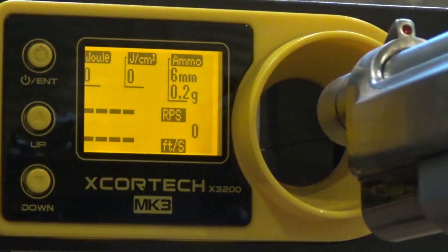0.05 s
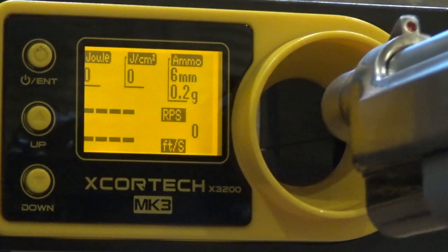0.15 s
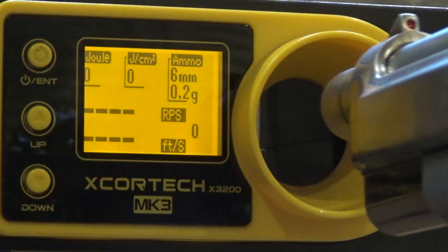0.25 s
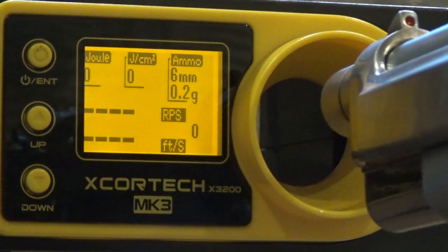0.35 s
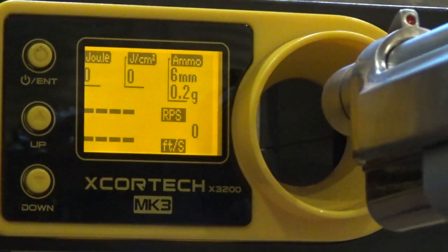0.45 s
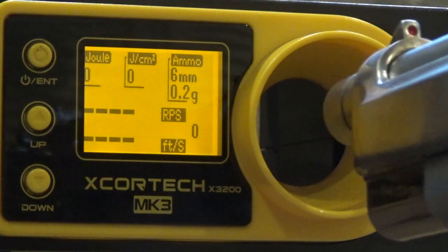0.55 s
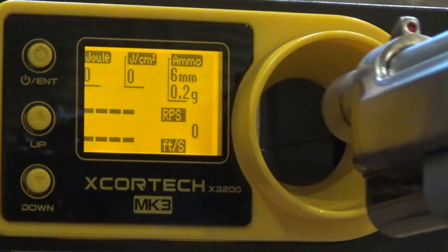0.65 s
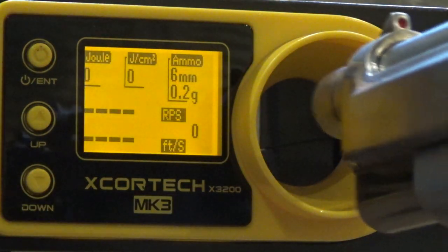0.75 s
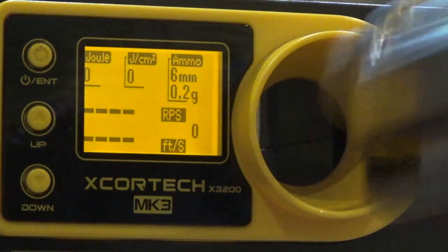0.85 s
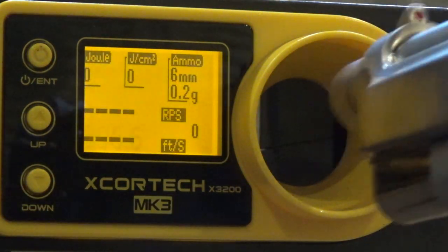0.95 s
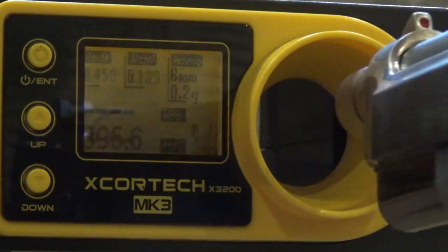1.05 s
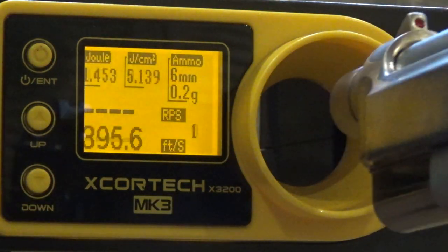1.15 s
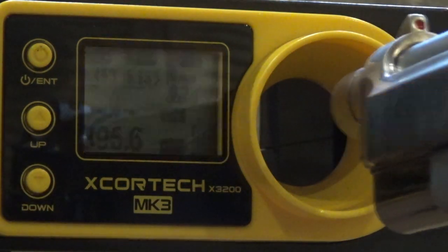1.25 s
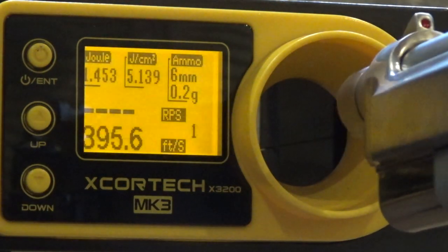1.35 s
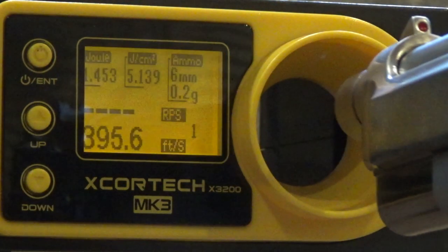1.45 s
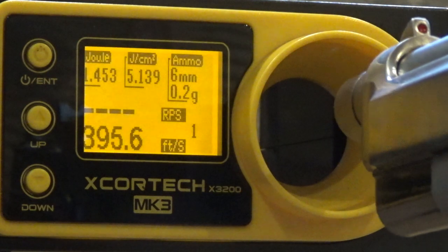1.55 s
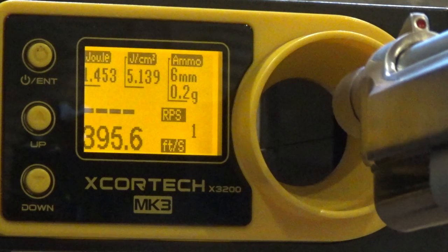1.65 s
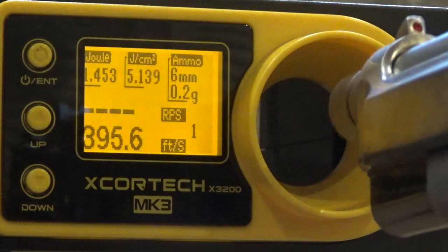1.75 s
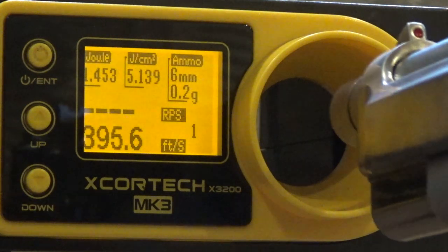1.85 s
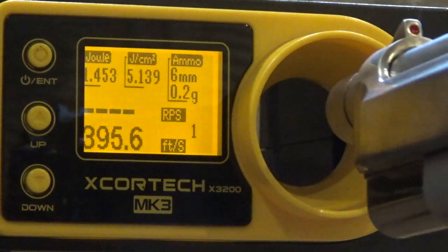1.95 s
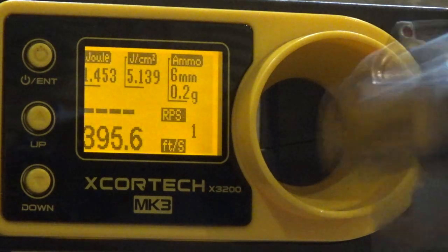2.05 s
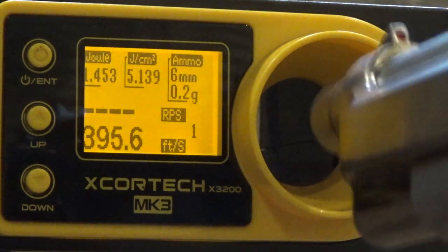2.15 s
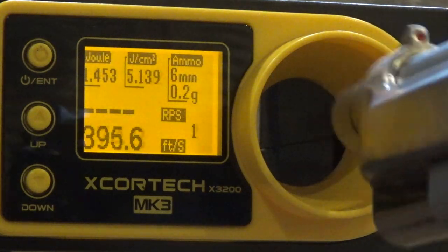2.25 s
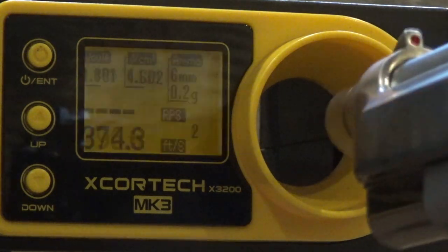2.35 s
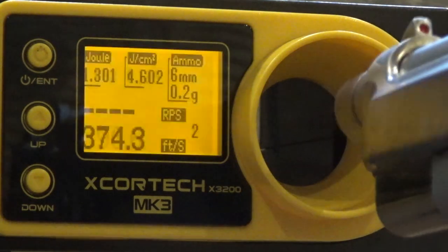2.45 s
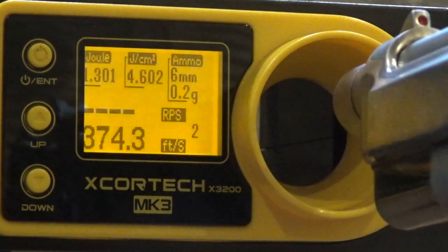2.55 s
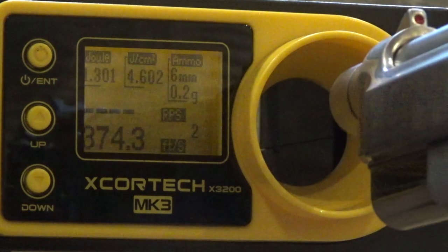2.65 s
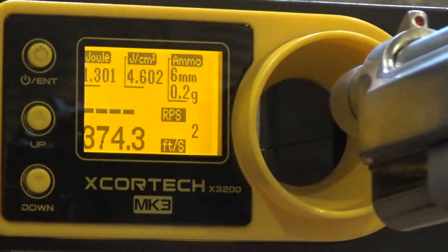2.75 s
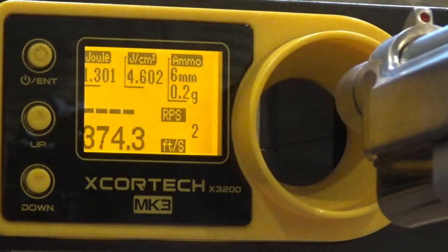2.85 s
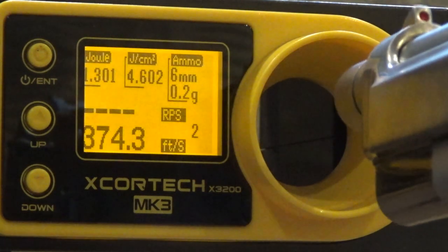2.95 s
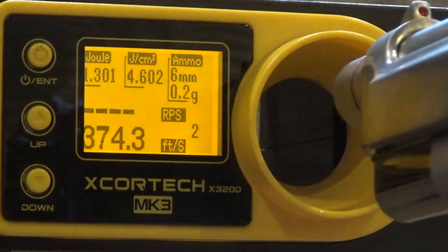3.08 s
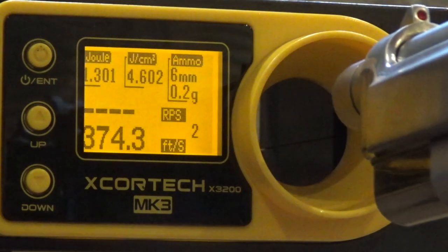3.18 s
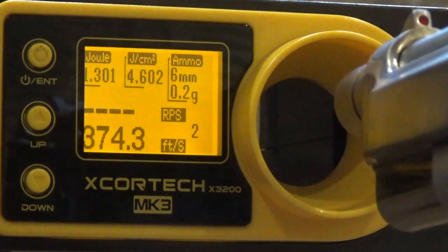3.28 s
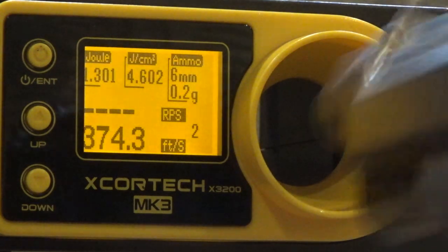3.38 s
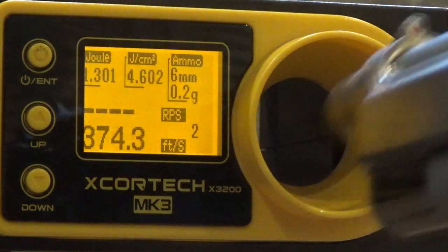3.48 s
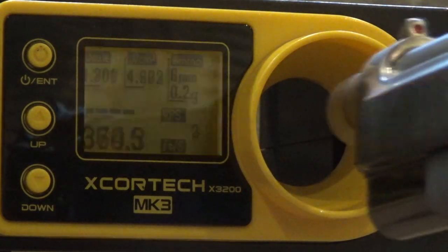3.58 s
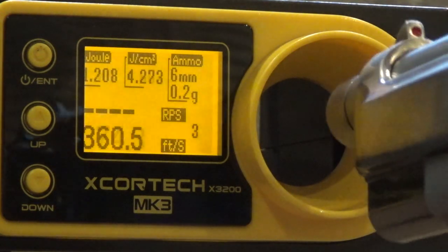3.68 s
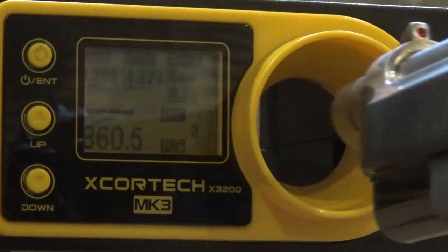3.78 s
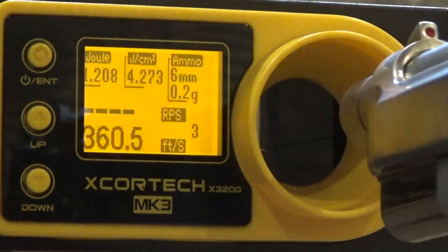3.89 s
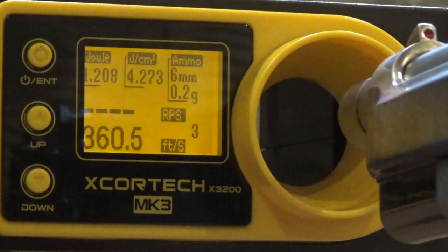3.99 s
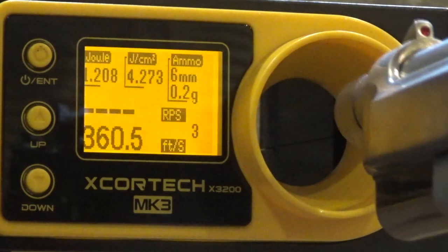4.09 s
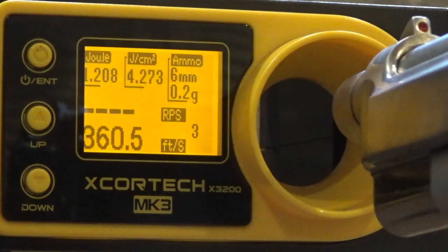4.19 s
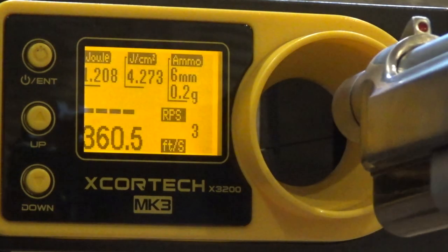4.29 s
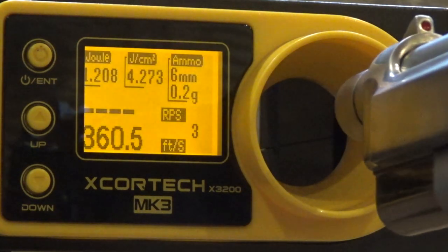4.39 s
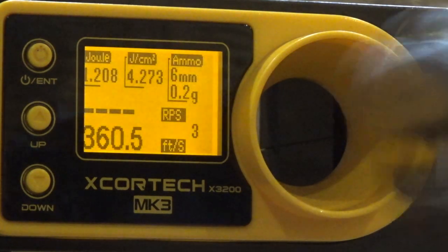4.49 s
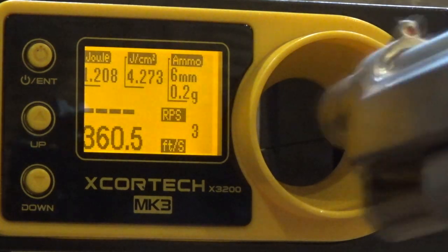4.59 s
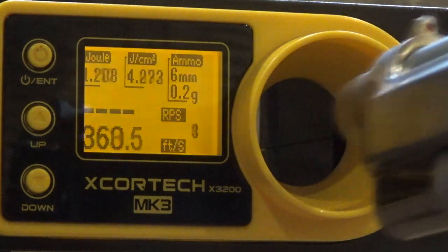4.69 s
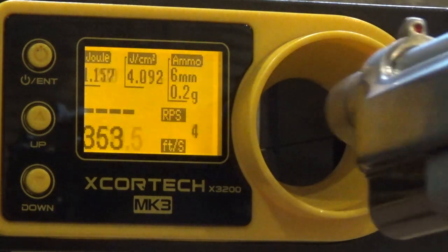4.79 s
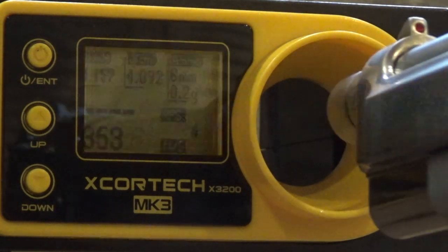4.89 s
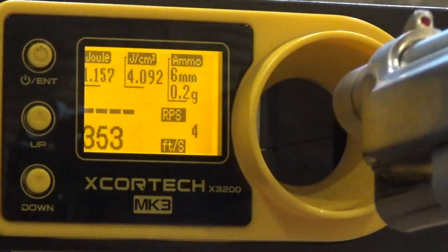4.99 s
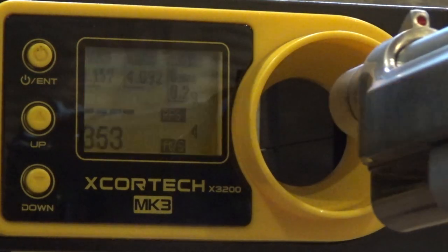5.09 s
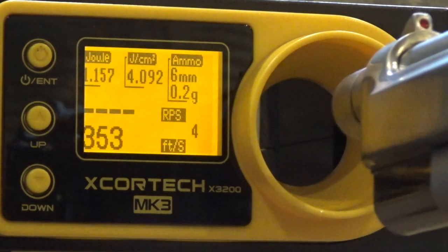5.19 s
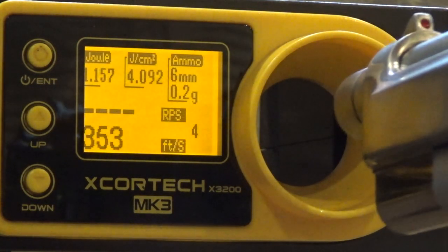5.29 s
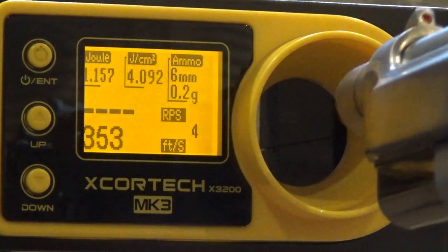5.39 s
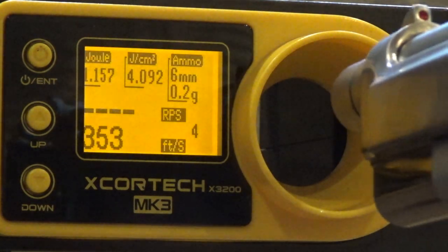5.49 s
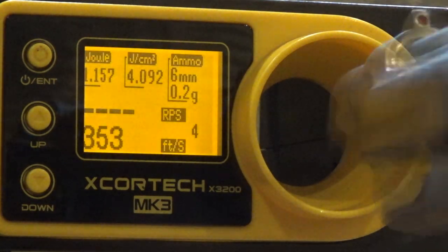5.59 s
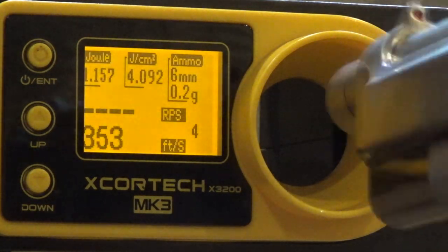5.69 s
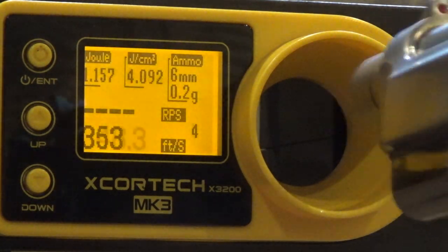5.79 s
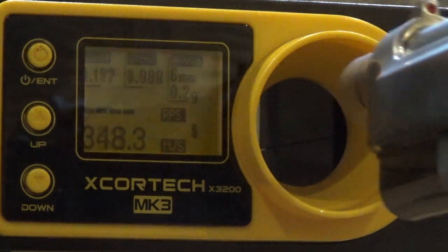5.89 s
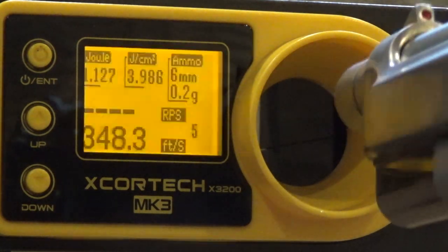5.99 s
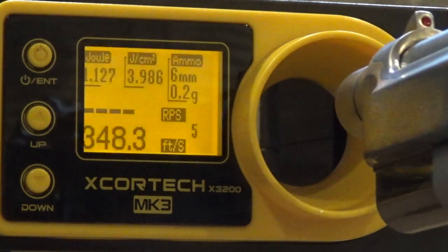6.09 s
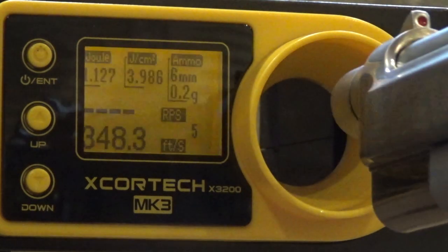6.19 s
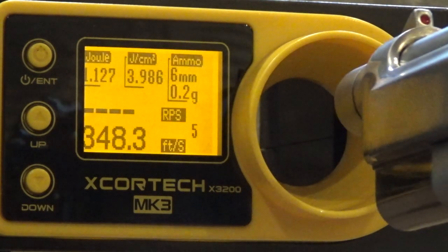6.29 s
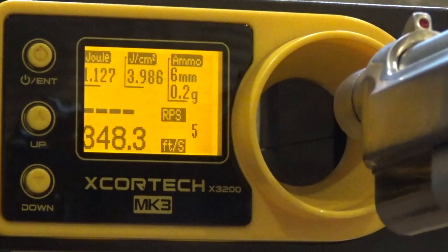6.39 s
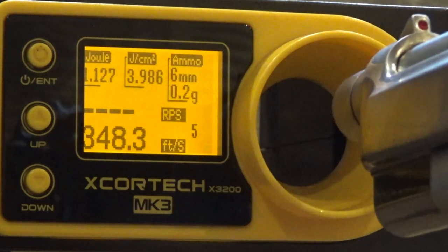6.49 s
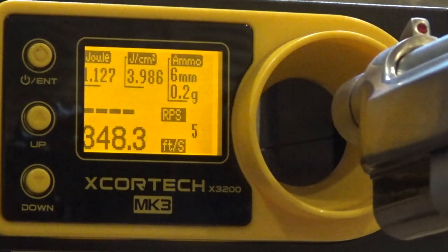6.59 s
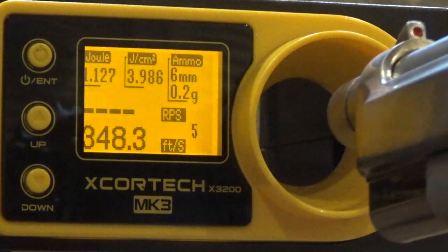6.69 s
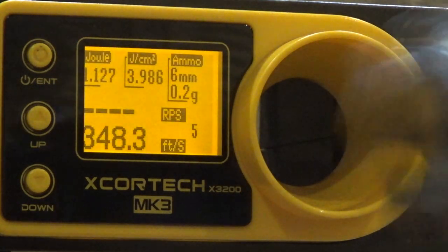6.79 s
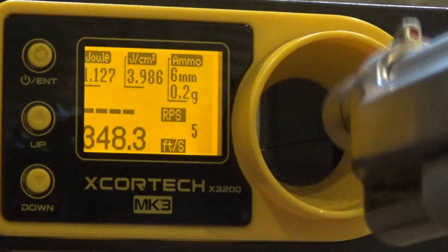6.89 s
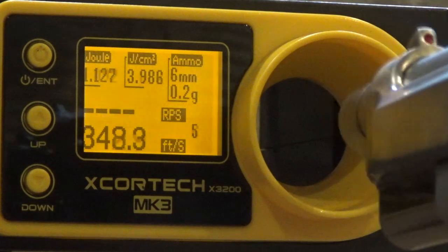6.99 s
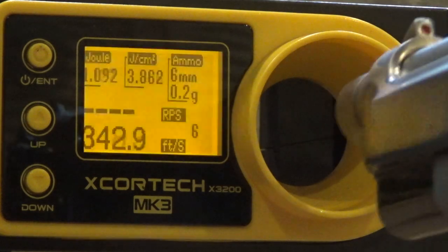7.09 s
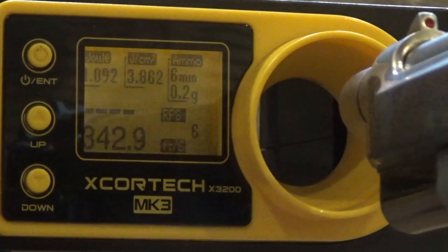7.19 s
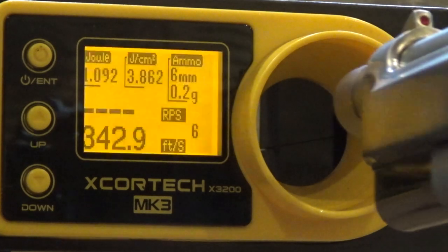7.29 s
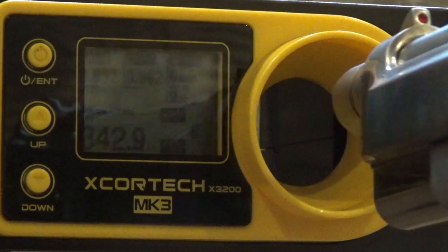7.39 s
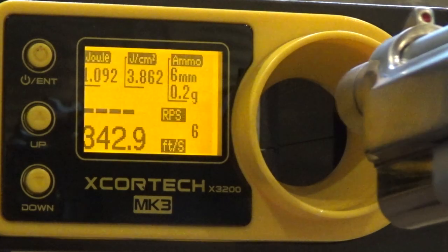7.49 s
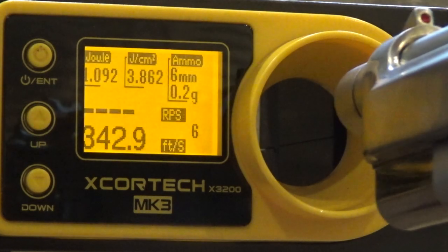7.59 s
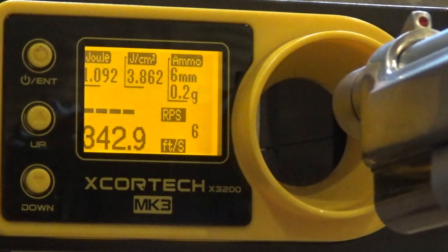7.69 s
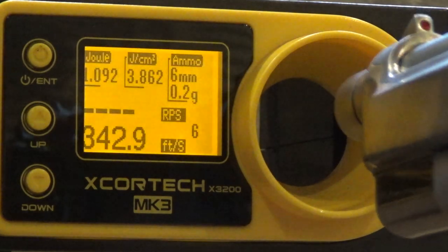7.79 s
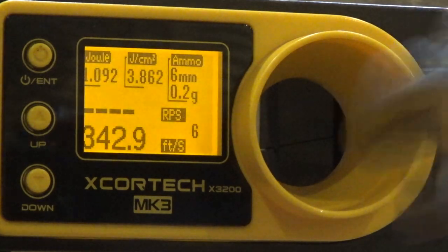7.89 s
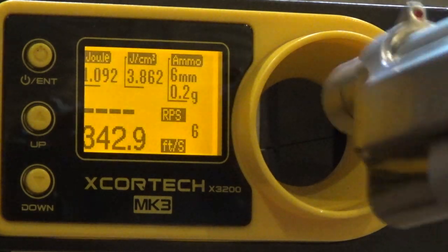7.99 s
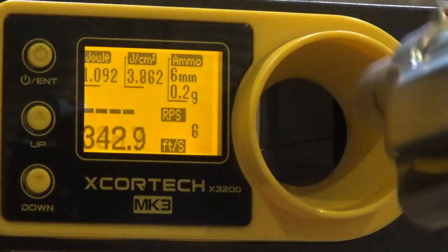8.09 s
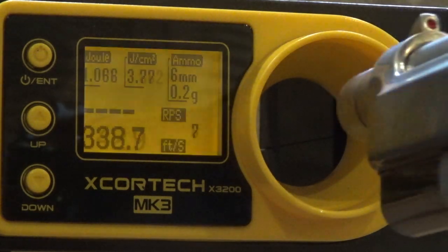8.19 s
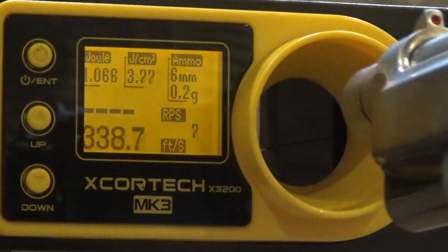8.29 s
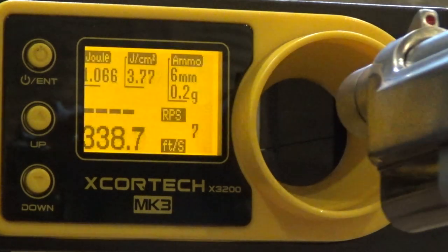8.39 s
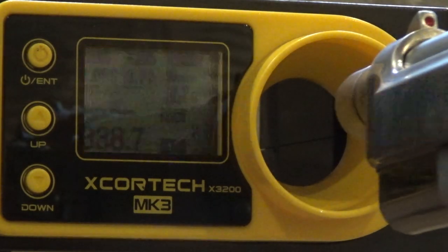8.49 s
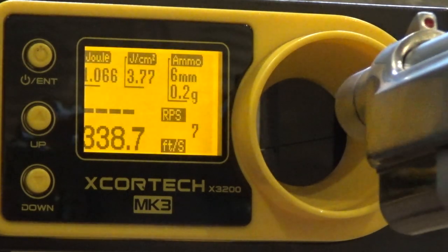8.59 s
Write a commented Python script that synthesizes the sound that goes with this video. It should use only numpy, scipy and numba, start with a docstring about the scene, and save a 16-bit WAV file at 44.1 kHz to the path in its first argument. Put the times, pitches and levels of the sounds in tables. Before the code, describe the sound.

A gas airsoft pistol fires seven single shots, a little over a second apart, close to the microphone in a small echoing room. Each is a sharp, bright burst of gas merged with the metallic clack of the slide snapping back and shut. A short echo follows, along with a light tick as the trigger resets. Only quiet room air lies between the shots.

```python
"""Seven sharp shots from a gas blowback airsoft pistol, close by in a small, echoing room.
In each shot the hammer and valve click, gas bursts from the muzzle, the slide flies back, rings and
slams shut, and the trigger resets. The gas gets colder with every shot, so its whistle rises a little.
A fast limiter (an automatic volume control) flattens the blast and its echoes into one dense crash,
which dies away into quiet room air."""
import sys
import numpy as np
from scipy import signal
from scipy.fft import rfft, irfft
from scipy.io import wavfile
from scipy.ndimage import uniform_filter1d
from numba import njit

SR = 44100
rng = np.random.default_rng(int(sys.argv[2]) if len(sys.argv) > 2 else 0)


def int16_out(signal):
    """Quantize to a 16-bit WAV file."""
    q = np.round(np.clip(np.atleast_2d(signal).T, -1, 1) * 32767)
    wavfile.write(sys.argv[1], SR, q.astype(np.int16))


N = 381453

# the shots: start_s, blast_db, puff_db, whistle_db, slam_delay_s, slam_db
SHOTS = [(0.8453, 0.5, -12.5, 2.5, 0.055, -10), (2.1037, 0, -10.5, -4.5, 0.064, -9.5),
         (3.3761, 0, -5, 0.5, 0.055, -8), (4.5037, 0.5, 0.5, -3, .0555, -6.5),
         (5.6449, 2.5, 0, -16.5, .0562, -12), (6.8146, .5, -5, -6, .0571, -9.5),
         (7.9292, 1, -4, -1, .0579, -7)]
# hammer and valve clicks before each blast: early_s, level_db, fade_s (time to fall by 60 dB)
ACTION_CLICKS = [(.0141, -21.5, 0.028), (0.012, -15, 0.011), (.0057, -17.5, 0.021), (0.0016, -12, 0.02)]
# the trigger snapping back after each shot: start_s, level_db
TRIGGER_RESETS = [(0.9887, -16), (2.2668, -18), (3.54, -17.5), (4.67, -17), (5.8096, -15.5), (6.979, -15.5),
                  (8.1099, -18)]
# ringing tones of the slide and barrel, and of the trigger spring: pitch_hz, level_db, fade_s
SLIDE_TONES = [(2140, -15.5, 0.016), (8440, -19, .02), (10080, -3.5, 0.026), (10360, -3, 0.022),
               (10430, -2, 0.019), (11150, -4.5, .02), (12200, -15.5, 0.018)]
SPRING_TONES = [(12150, -18, .06), (14010, -5, .007), (14400, -12, .025), (14900, -4, .007)]
# tone colour of rushing gas, and of the valve's whistle with warm gas: pitch_hz, level_db
GAS_COLOUR = [(40, -31), (200, -0.5), (700, 0), (1500, -0.5), (3000, -2.5), (4600, -2.5), (5800, 0),
              (7400, -0.5), (9500, 5.5), (10300, 8.5), (11200, 5), (12500, 5.5), (14000, -4), (16000, 1.5)]
WHISTLE_COLOUR = [(2000, -41.5), (4800, -14.5), (5400, -4), (5680, 2), (5980, -4.5), (6600, -13),
                  (12000, -34)]
# tone colour of small clicks, and of the slide slamming shut: pitch_hz, level_db
CLICK_COLOUR = [(200, -26.5), (1200, -12.5), (2800, -2), (4200, -6.5), (5500, 3.5), (7200, -4.5),
                (9000, 4.5), (12500, -6), (15500, -14)]
CLACK_COLOUR = [(150, -9), (800, -6), (2000, 3.5), (4500, 0.5), (7500, 1.5), (10000, 10), (12500, 5),
                (16000, -14.5)]
# tone colour of the room's echoes, and of the low boom that outlasts them: pitch_hz, level_db
ECHO_COLOUR = [(30, -15), (110, -11.5), (170, -4), (255, 4.5), (320, -0.5), (385, 7), (460, 3), (560, 6.5),
               (900, 2), (2000, 2.5), (5000, 2), (10000, -1), (16000, 3)]
BOOM_COLOUR = [(120, -24), (260, -8.5), (325, -2), (362, 2.5), (425, -10), (520, -5.5), (600, -3),
               (800, -14.5), (2000, -40.5), (8000, -60)]
# how long the echoes last: pitch_hz, fade_s
ECHO_FADE = [(100, 0.38), (250, 0.34), (400, 0.3), (630, 0.32), (1000, 0.4), (2200, 0.42), (5800, 0.41),
             (8000, 0.41), (11000, 0.34), (15000, 0.25)]
# tone colour of the room air, and of a faint whine: pitch_hz, level_db
AIR_COLOUR = [(15, -37), (25, -7.5), (113, -3.5), (340, -4.5), (368, -5), (509, -6), (552, -6.5), (598, -8),
              (919, -6), (1300, -10.5), (2060, -12), (3090, -14.5), (4150, -15), (15500, -21)]
WHINE_COLOUR = [(1000, -41), (1900, -21.5), (2060, 4), (2230, -17), (4000, -41.5)]
# stereo width (side against mid) of the echoes, and of the room air: pitch_hz, side_db
ECHO_WIDTH = [(50, -18), (250, -19.5), (600, -11.5), (1500, -8.5), (4500, -7.5), (8000, -7.5),
              (12000, -19.5)]
AIR_WIDTH = [(60, -10), (110, -15.5), (200, -8.5), (380, -4), (700, -1), (1290, -0.5), (2380, -1),
             (4400, -5), (8120, -12), (15000, -30)]

TAIL = np.arange(int(.9 * SR)) / SR  # clock for echoes, in seconds
HIT = TAIL[:SR // 4]  # clock for short sounds
LEAD_S = .02  # time left for the clicks before each blast


def gas_blast(db, puff_db, vent_s, whistle, jet_db=5, spurt_db=2, squeal_db=6, bump_db=7, hiss_db=-7):
    """Gas bursts from the muzzle: a rough jet and one smooth puff of pressure."""
    out = undb(db + jet_db) * jet(length_s=.0028)
    out += undb(puff_db + bump_db) * swell(length_s=.0021) ** 2
    # a second, whistling spurt follows the pellet
    squeal = undb(db + squeal_db) * crack(whistle, fade_s=.011)
    add(out, .0042, undb(db + spurt_db) * jet(length_s=.002) + squeal)
    # gas hisses out around the slide, and the cylinder pops like a short pipe as it opens
    out += undb(db + hiss_db) * crack(GAS_COLOUR, fade_s=.09)
    add(out, vent_s, np.sin(2 * np.pi * 520 * HIT) * swell(length_s=.0036))
    return out


def jet(length_s):
    """Swirling gas escapes for a moment."""
    return colour(burst(swell(length_s)), GAS_COLOUR)


def muzzle_beam(db, whistle_db, whistle, valve_db=-1):
    """The jet shoots on through a pellet speed meter into the room, tinted by the valve's whistle."""
    gas = burst(swell(length_s=.003))
    return undb(db) * (colour(gas, GAS_COLOUR) + undb(whistle_db + valve_db) * colour(gas, whistle))


def moving_parts(slam_s, slam_db, stop_db=-1, ring_db=15.5, clack_db=5.3, blows=3):
    """Hammer and valve click; the slide rattles on its rear stop, then slams shut and bounces."""
    stop_s, rattle_gap_s = .021, .004
    bounce_gap_s, bounce_loss_db = .0047, 3.5
    out = np.zeros(len(HIT))
    for early_s, db, fade_s in ACTION_CLICKS:
        add(out, LEAD_S - early_s, undb(db) * crack(CLICK_COLOUR, fade_s))
    for k in range(blows):
        add(out, LEAD_S + stop_s + k * rattle_gap_s, undb(stop_db) * ring(SLIDE_TONES))
    for k in range(blows):
        blow = undb(ring_db) * ring(SLIDE_TONES) + undb(clack_db) * crack(CLACK_COLOUR, fade_s=.034)
        add(out, LEAD_S + slam_s + k * bounce_gap_s, undb(slam_db - k * bounce_loss_db) * blow)
    return out


def trigger(db, spring_db=4, tick_db=-3):
    """The trigger snaps forward: a tick and the ping of its spring."""
    ping = undb(spring_db) * ring(SPRING_TONES)
    tick = undb(tick_db) * crack(CLICK_COLOUR, fade_s=.03)
    return undb(db) * (ping + tick)


def ring(tones, scatter_db=3, detune=.005):
    """Struck metal rings; each blow gives its tones slightly different strengths and pitches."""
    out = np.zeros(len(HIT))
    for hz, db, fade_s in tones:
        weaker, sharper, phase = rng.standard_normal(3)
        wave = np.sin(2 * np.pi * (hz * (1 + detune * sharper) * HIT + phase))
        out += undb(db - scatter_db * weaker) * fade(HIT, fade_s) * wave
    return out


def crack(spectrum, fade_s):
    """Sudden noise that dies fast, as when hard parts meet or gas spits out."""
    return colour(burst(fade(HIT, fade_s)), spectrum)


def room_echoes(sound, build_s=.0038):
    """Echoes pile up between near walls; their pattern changes as the gun shifts in the hand."""
    centres_hz = np.geomspace(100, 16000, 12)
    hz = np.fft.rfftfreq(len(TAIL), 1 / SR)
    noise = rfft(rng.standard_normal((2, len(TAIL))))
    echoes = 0
    # each band of pitch fades at its own speed
    for centre, share in zip(centres_hz, np.eye(len(centres_hz))):
        band = irfft(noise * look_up(np.column_stack([centres_hz, share]), hz), len(TAIL))
        echoes = echoes + band * fade(TAIL, look_up(ECHO_FADE, centre))
    mid, side = (colour(channel, ECHO_COLOUR) for channel in echoes)
    response = spread(mid, side, ECHO_WIDTH) * (1 - np.exp(-TAIL / build_s))
    response /= np.sqrt(np.sum(response[0] ** 2))
    return signal.fftconvolve(sound[None], response, axes=1)


def room_boom(db=-45, fade_s=1.16):
    """The room's low tones hang on after a blast."""
    return undb(db) * steady_noise(len(TAIL), BOOM_COLOUR) * fade(TAIL, fade_s)


def faint_hiss(db=-62, start_s=7.77, end_s=7.92, rise_s=.03):
    """A faint high hiss, like seeping gas, just before the last shot."""
    t = np.arange(N) / SR
    hiss = steady_noise(N, [(2000, -25), (7000, -12), (10000, -2), (12300, 0), (14000, -16)])
    return undb(db) * hiss * np.clip((t - start_s) / rise_s, 0, 1) * (t < end_s)


def room_air(db=-63.5, whine_db=-80):
    """Quiet, steady room air and microphone hiss, with a faint, fluttering whine."""
    mid, side = (steady_noise(N, AIR_COLOUR) for _ in range(2))
    whine = undb(whine_db) * steady_noise(N, WHINE_COLOUR)
    return undb(db) * spread(mid, side, AIR_WIDTH) + whine


def burst(envelope, passes=6):
    """Noise that follows a loudness shape, with its energy spread evenly from low to high."""
    noise = rng.standard_normal(len(HIT)) * envelope
    taper = np.abs(envelope) ** (1 / (2 * passes))
    for _ in range(passes):
        spectrum = rfft(noise)
        noise = irfft(spectrum / np.abs(spectrum), len(HIT)) * taper
    return unit(noise) * np.sqrt(np.mean(envelope ** 2))


def steady_noise(samples, spectrum):
    """Even noise with the given tone colour."""
    return unit(colour(rng.standard_normal(samples), spectrum))


def swell(length_s):
    """One smooth opening and closing of a gas path."""
    return np.sin(np.pi * np.minimum(HIT / length_s, 1))


def fade(t, fade_s):
    """Die away by 60 dB every fade_s seconds."""
    return np.exp(-np.log(1000) * t / np.maximum(fade_s, 1e-4))


def undb(db):
    """Turn decibels into a multiplier."""
    return 10 ** (np.asarray(db) / 20)


def unit(x):
    """Scale to an average (rms) level of 1."""
    return x / np.sqrt(np.mean(x ** 2))


def look_up(table, hz):
    """A table's value at hz, with octaves evenly spaced between its rows."""
    pitches_hz, values = np.transpose(table)
    return np.interp(np.log(np.maximum(hz, 1)), np.log(pitches_hz), values)


def colour(x, spectrum, size=4096):
    """Give a sound a tone colour (a minimum-phase filter)."""
    gains = undb(look_up(spectrum, np.fft.rfftfreq(size, 1 / SR)))
    cepstrum = irfft(np.log(gains))
    # fold the second half onto the first, so nothing rings before the sound starts
    cepstrum[1:size // 2] *= 2
    cepstrum[size // 2 + 1:] = 0
    response = irfft(np.exp(rfft(cepstrum)))
    return signal.fftconvolve(x, response)[:len(x)]


def add(track, start_s, sound):
    """Mix a sound into the track at start_s."""
    part = track[..., max(int(start_s * SR), 0):][..., :sound.shape[-1]]
    part += sound[..., :part.shape[-1]]


def spread(mid, side, width):
    """Sound from all around: left is mid plus side, right is mid minus side."""
    return mid + colour(side, width) * np.array([[1], [-1]])


def scene(beam_db=13, spill_db=-10, trigger_spill_db=-5, cooling_shots=2.5, whistle_rise=.055):
    """The gun fires straight ahead; the room answers its muzzle jet far more than its moving parts."""
    warm_vent_s, cold_lag_s = .006826, .0016  # cold gas leaves the cylinder later
    out = room_air() + faint_hiss()
    for fired, (start_s, db, puff_db, whistle_db, slam_s, slam_db) in enumerate(SHOTS):
        reset_s, reset_db = TRIGGER_RESETS[fired]
        chill = 1 - np.exp(-fired / cooling_shots)  # 0 is warm, 1 is fully cold
        whistle = np.array(WHISTLE_COLOUR) * [1 + whistle_rise * chill, 1]
        near, snap = moving_parts(slam_s, slam_db), trigger(reset_db)
        add(near, LEAD_S, gas_blast(db, puff_db, warm_vent_s + cold_lag_s * chill, whistle))
        into_room = undb(spill_db) * near
        add(into_room, LEAD_S, undb(beam_db) * muzzle_beam(db, whistle_db, whistle))
        add(into_room, LEAD_S + reset_s - start_s, undb(trigger_spill_db) * snap)
        add(out, start_s - LEAD_S, near)
        add(out, reset_s, snap)
        add(out, start_s - LEAD_S, room_echoes(into_room))
        add(out, start_s, undb(db) * room_boom())
    return out


@njit
def follow(x, rise, fall):
    """Track a level smoothly, with separate rise and fall rates per sample."""
    out, level = np.empty(len(x)), 0.
    for i in range(len(x)):
        level += (x[i] - level) * (rise if x[i] > level else fall)
        out[i] = level
    return out


def limiting_db(x, threshold_db=-16, attack_s=.00064, release_s=.0086, slope=.91):
    """How far the limiter turns both channels down; it looks a little ahead."""
    level = follow(np.abs(x).max(axis=0), 1 / (1 + attack_s * SR), 1 / (1 + release_s * SR))
    over_db = np.maximum(20 * np.log10(level + 1e-9) - threshold_db, 0)
    ahead = SR // 2000
    return slope * uniform_filter1d(np.roll(over_db, -ahead), ahead)


def record(dry, low_cuts_hz=(50, 62), memory_s=2.1, memory_depth=2.05, ceiling=.36, top_hz=15700):
    """Two slightly unequal microphones thin the bass; loud peaks are tamed and the top treble is cut."""
    x = np.array([signal.sosfilt(signal.butter(1, hz, "high", fs=SR, output="sos"), channel)
                  for hz, channel in zip(low_cuts_hz, dry)])
    rate = 1 / (memory_s * SR)
    x = x * undb(-memory_depth * follow(limiting_db(x), rate, rate))  # volume stays down after a shot
    x = x * undb(-limiting_db(x))  # fast limiter
    x = ceiling * np.tanh(x / ceiling)  # soft overload
    return signal.sosfilt(signal.ellip(10, .2, 75, top_hz, fs=SR, output="sos"), x)


dry = scene()
out = record(dry)
int16_out(out)
```